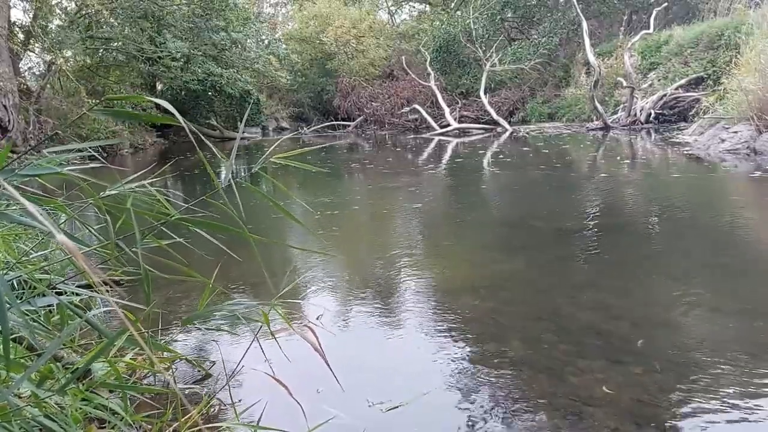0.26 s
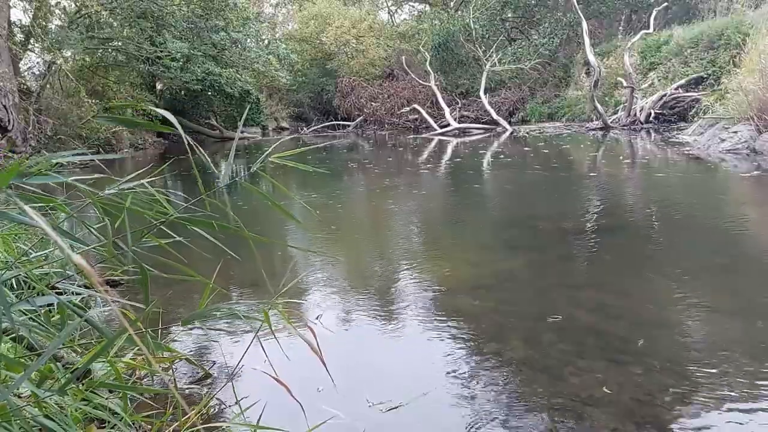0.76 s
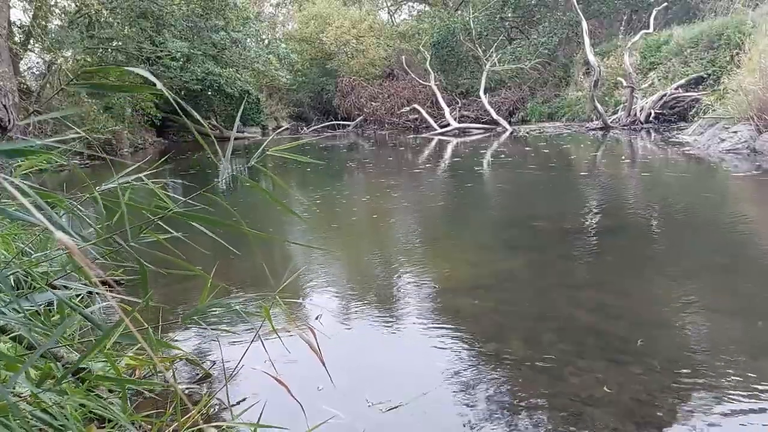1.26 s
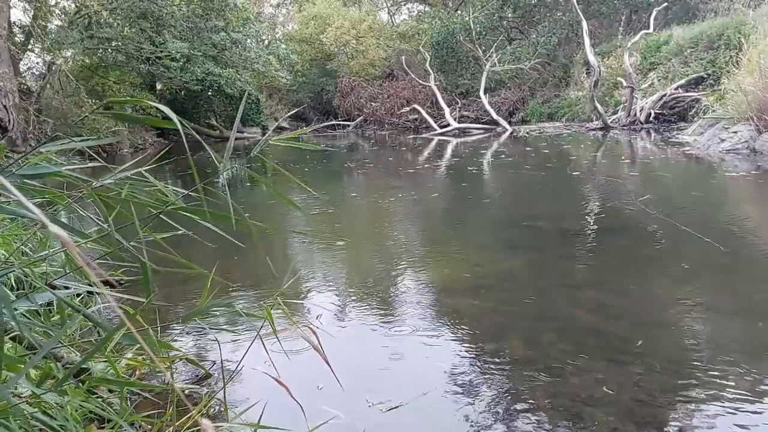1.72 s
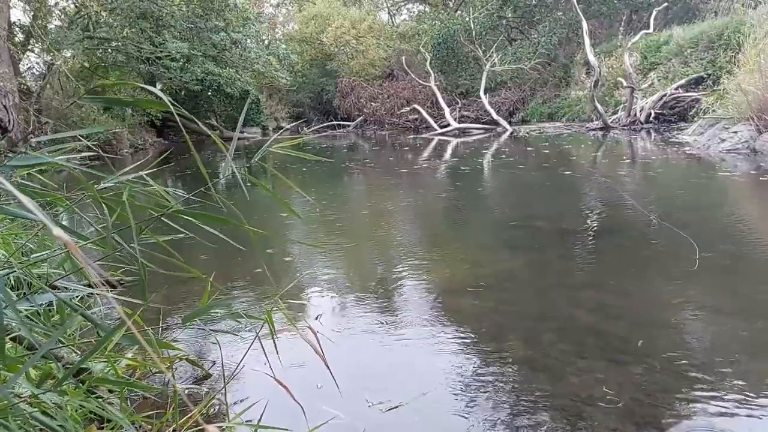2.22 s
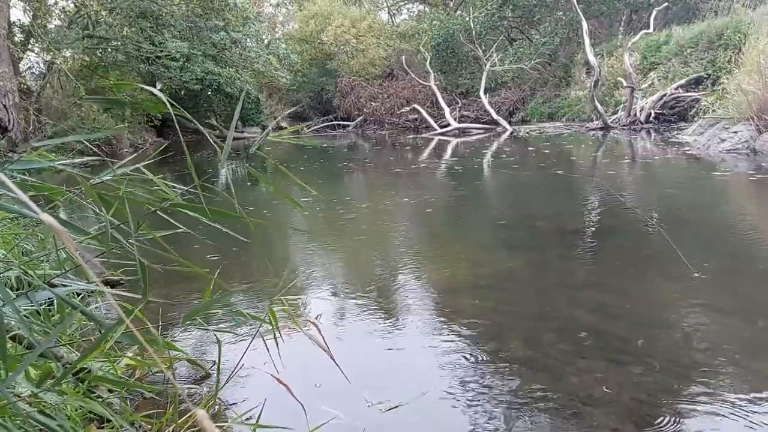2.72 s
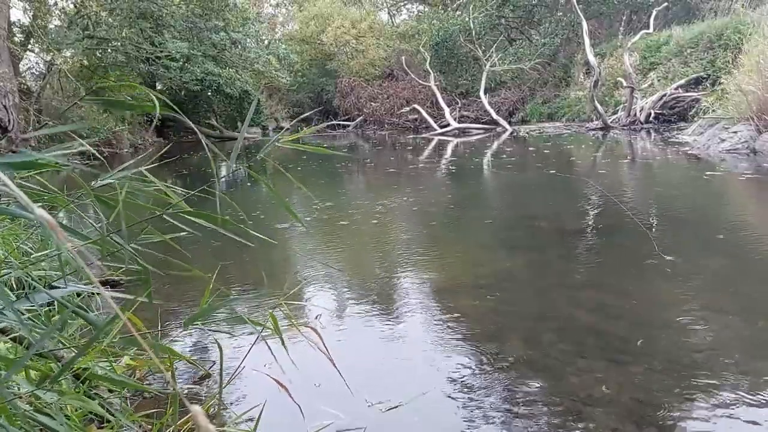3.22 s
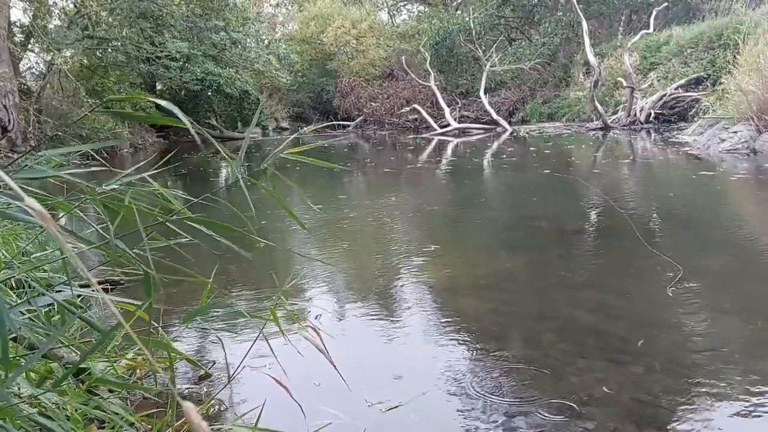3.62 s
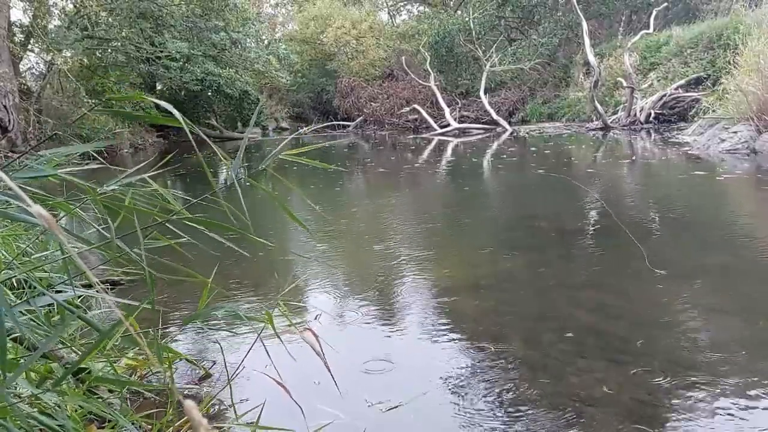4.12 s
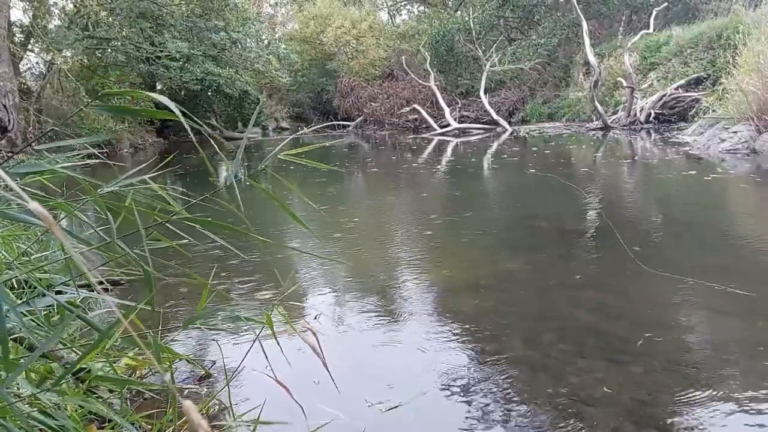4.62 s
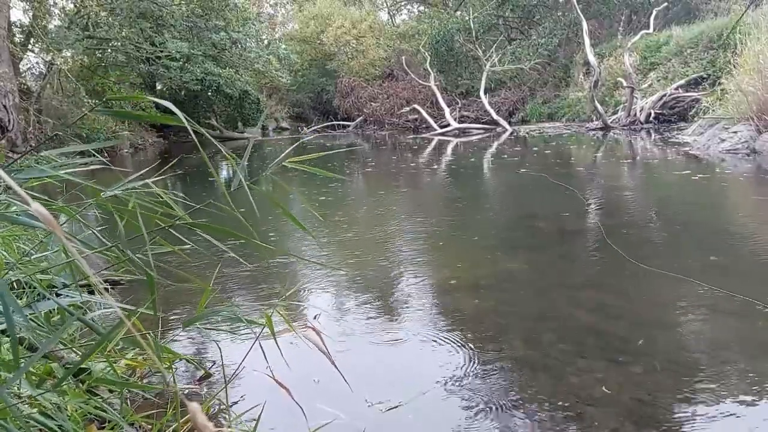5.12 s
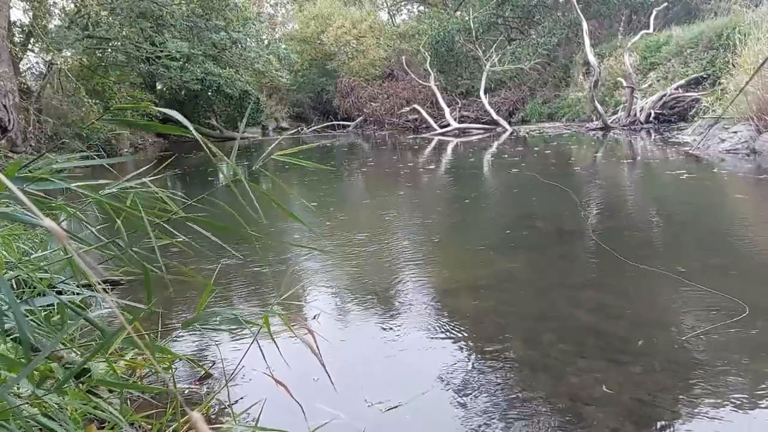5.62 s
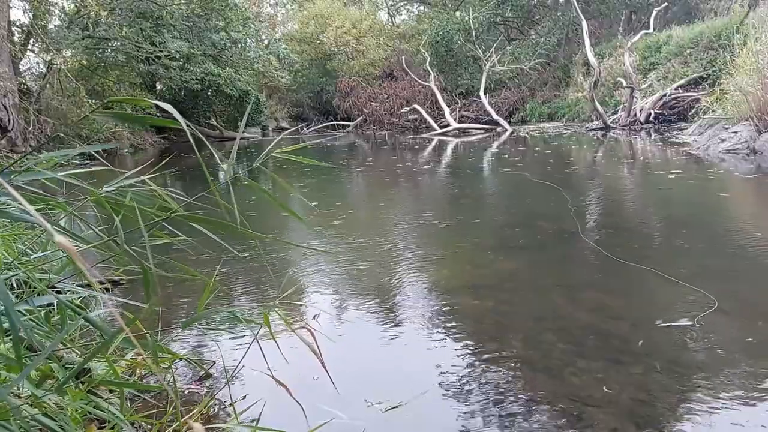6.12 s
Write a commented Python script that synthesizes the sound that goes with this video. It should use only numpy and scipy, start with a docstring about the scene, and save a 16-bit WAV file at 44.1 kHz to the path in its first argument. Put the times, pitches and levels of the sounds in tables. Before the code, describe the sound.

A slow stream makes a faint, even wash with a tiny gurgle throughout, easing slightly toward the end at about 6.4 seconds. Close by, two light bright tackle ticks come near 0.9. From 1.13 to 1.36 the fishing reel gives one loud metallic ratchet rasp, its clicks racing and then slowing. Very faint ticks fall near 2.0 and 2.2, then three crisp reel clicks bunch together around 2.66 to 2.71. A faint bird note at 3.25 and a tiny low plop at 3.4 follow. After a small tick at 3.85, line zips through the rod rings at 3.9, a very short, bright hiss ending in a hard knock. Soft plops ring at 4.1 to 4.3 and 5.1. Distant hoarse bird chirps come at 5.2, 5.35, 5.55 and 5.9, around drops and a small noisy splash at 5.7.

```python
"""A slow stream, where a fly fisher works a line over a faint steady wash of water.
Pawl impacts ring a reel's modes: one quick rasp that speeds up and slows, later three single ticks.
The line zips through the rod rings by stick-slip friction and comes taut with a knock.
Light tackle ticks, ringing plops, a noisy splash and a far bird's short notes are heard around it.
The recorder's gain control steps back on sustained loud sound, waits, then recovers."""
import sys
import numpy as np
from scipy import signal
from scipy.fft import rfft, irfft
from scipy.io import wavfile
from scipy.ndimage import uniform_filter1d, minimum_filter1d

SR = 44100
rng = np.random.default_rng(int(sys.argv[2]) if len(sys.argv) > 2 else 0)


def generate_wav(signal):
    """Clip the signal to [-1, 1] and save it as 16-bit WAV at the path in sys.argv[1]."""
    frames = np.transpose(np.atleast_2d(signal))
    scaled = np.clip(frames, -1, 1) * 32767
    pcm = np.round(scaled).astype(np.int16)
    wavfile.write(sys.argv[1], SR, pcm)


N = 280476
TIME = np.arange(N) / SR   # seconds

# Spool speed in one pull of line. Each row: time in seconds, speed in teeth per second.
SPOOL_SPEED = [(1.126, 52.1), (1.1792, 134.3), (1.1943, 139.8), (1.2429, 102.7), (1.3329, 31.8),
               (1.36, 11.5)]
LIGHT_PHASE = .492   # share of a tooth between the hard and the light contact
PULL_HARD_DB, PULL_LIGHT_DB = 5, 3.5
# Single contacts as the spool creeps on. Each row: start in seconds, level in dB, light contact 0 or 1.
CREEP_CONTACTS = [(2.6636, 1.5, 0), (2.6784, 3.5, 1), (2.7058, 1, 0)]
# Reel modes, the lowest a close pair. Each row: frequency in Hz, 60 dB decay time in seconds,
# relative level in dB under a hard contact, relative level in dB under a light contact.
REEL_MODES = [(1966, 0.013, -3.5, -20), (2030, 0.01, -2.5, -20), (2770, 0.0053, -15.5, -19.5),
              (3300, 0.0051, -9.5, -17.5), (3650, 0.0051, -11.5, -9.5), (4400, 0.0034, -16, -11),
              (5030, 0.0033, -6.5, -28), (5760, 0.0076, -11, -25), (6154, 0.011, -14.5, -14.5),
              (8820, 0.0054, -24, -26), (8930, 0.0069, -20, -29.5), (10680, 0.0043, -18, -17),
              (12290, 0.0035, -12.5, -19.5), (13650, 0.001, -17.5, -7.5)]

# Surges of line through the rings. Each row: peak time in seconds, relative level in dB.
LINE_SURGES = [(3.9032, -12), (3.9076, -6.5), (3.918, -10.5), (3.9245, -8.5)]
SURGE_RISE_DB_PER_S, SURGE_FALL_DB_PER_S = 13999, 1250.5
# Resonances of the rod rings. Each row: frequency in Hz, width in Hz, relative level in dB.
RING_RESONANCES = [(3770, 1200, -7), (4900, 400, -0.5), (5520, 370, 5), (6150, 810, -0.5),
                   (9030, 1050, -32), (10600, 1200, -22), (12800, 1900, -11)]
# Tension builds until the line is taut, then lets go.
TAUT_S, TAUT_DB, TIGHTEN_DB_PER_S, SLACKEN_DB_PER_S = 3.926, -23, 899, 501
# Jolt of the taut line on the rod. Each row: start in seconds, force level in dB.
ROD_KNOCKS = [(3.928, 8.5)]
# Rod and grip modes. Each row: frequency in Hz, 60 dB decay time in seconds, relative level in dB.
ROD_MODES = [(570, 0.023, -27), (750, 0.025, -26.5), (857, .05, -27), (1100, 0.015, -25.5),
             (1400, 0.016, -24.5), (1775, 0.0178, -23.5), (2110, 0.0072, -22), (3276, 0.0031, -21)]

# Light touches of tackle. Each row: start in seconds, ring force in dB, dry crack force in dB.
TACKLE_TICKS = [(.858, -2, -48), (.896, -15, -55), (2.005, -31, -27), (2.225, -26, -42), (3.35, -35, -30),
                (3.8478, -34.5, -23), (3.8508, -11.5, -31)]
# Tackle modes. Each row: frequency in Hz, 60 dB decay time in seconds, relative level in dB.
TACKLE_MODES = [(5300, 0.0073, -20.5), (8000, 0.0098, -36), (12450, .004, -41.5)]

# The line slaps the water.
SPLASH_S, SPLASH_DB, SPLASH_RISE_DB_PER_S, SPLASH_FALL_DB_PER_S = 5.678, -47.5, 1000, 210
# Splash resonances. Each row: frequency in Hz, width in Hz, relative level in dB.
SPLASH_RESONANCES = [(506, 150, 0), (900, 240, 3.5), (1750, 240, 2.5), (3140, 850, -2), (10000, 6600, -18)]
# Plops and drops. Each row: start in seconds, force in dB, pitch in Hz, 60 dB decay time in seconds.
WATER_PLOPS = [(3.419, -44, 294.7, 0.083), (4.107, -40.5, 310, 0.12), (4.245, -39.5, 900, 0.083),
               (4.328, -43.5, 420, 0.063), (5.088, -41, 860, 0.11), (5.476, -50, 1100, .1),
               (5.53, -53, 2020, 0.18), (5.674, -39.5, 509, 0.075), (5.685, -48, 1800, 0.083),
               (5.7, -46, 860, 0.089)]
# Bird notes. Each row: centre in seconds, level in dB, pitch in Hz, half-length in seconds.
BIRD_NOTES = [(3.25, -48, 5950, 0.035), (5.192, -54.5, 4200, 0.035), (5.339, -47.5, 4260, 0.027),
              (5.563, -49.5, 4240, 0.026), (5.912, -51.5, 4400, 0.018)]

# Slow easing of the stream. Each row: time in seconds, level in dB.
STREAM_LEVEL = [(0, -50), (3.1, -50.5), (6.36, -52.5)]
# Spectrum of the wash. Each row: frequency in Hz, relative density in dB per Hz.
WASH_SPECTRUM = [(120, -53), (200, -8.5), (239, -0.5), (281, 0), (330, 0.5), (464, -2), (795, -5.5),
                 (951, -6.5), (1780, -14), (2940, -12.5), (4690, -13), (5920, -12.5), (7340, -24),
                 (13000, -20), (14500, -28.5)]
RUMBLE_DB = -31   # below 200 Hz, relative to the wash
# Short noisy tail after each tackle sound. Each row: delay in seconds, relative level in dB.
TAIL_DECAY = [(.004, 7), (.012, 0.5), (.038, -4), (.055, -13.5), (.09, -42)]

# The recorder's gain control and its upper band limit.
AGC_THRESHOLD_DB, AGC_DEPTH_DB, AGC_WINDOW_S, AGC_HOLD_S, AGC_RECOVER_DB_PER_S = -18, 4, .08, 1.056, 8
CUTOFF_HZ = 14500


def pawl_contacts():
    """Ratchet kinematics: turning integrates spool speed; each tooth gives a hard, then a light contact."""
    s, speed = np.transpose(SPOOL_SPEED)
    moving = TIME[(TIME >= s[0]) & (TIME <= s[-1])]
    turned = np.cumsum(np.interp(moving, s, speed)) / SR   # teeth
    rows = []
    for tooth in range(int(turned[-1]) + 1):
        for phase, db, light in [(0, PULL_HARD_DB, 0), (LIGHT_PHASE, PULL_LIGHT_DB, 1)]:
            if tooth + phase < turned[-1]:
                rows.append((np.interp(tooth + phase, turned, moving), db, light))
    return rows


def reel(level_db=3.5, low_cut_hz=1660, detune=0.013, uneven_db=1.8, size=1500):
    """Modal excitation: hard and light contacts ring the same modes in different proportions."""
    body = np.zeros(N)
    dying = np.exp(-np.arange(size) / (.0016 * SR))
    clicks = pawl_contacts() + CREEP_CONTACTS
    grit = butter(rng.standard_normal((len(clicks), size)), 4200, "high")
    chance = rng.standard_normal((len(clicks), len(REEL_MODES), 2))
    chance[:, 1] = chance[:, 0]   # the close pair moves as one
    for (s, db, light), chatter, variation in zip(clicks, grit, chance):
        is_light = light > .5
        # one sharp blow, then the pawl chatters on the tooth
        force = (.15 if is_light else .11) * dying * chatter
        force[0] = 1
        force *= from_db(db) / np.linalg.norm(force)
        at = round(s * SR)
        for k, (mode, (pitch, strength)) in enumerate(zip(REEL_MODES, variation)):
            hz, t60, hard_db, light_db = mode
            mode_db = light_db if is_light else hard_db
            # each contact loads the modes a little differently; senses alternate pair by pair
            gain = (-1) ** ((k + 1) // 2) * from_db(mode_db + uneven_db * strength)
            body[at:at + size] += gain * ring(force, hz * (1 + detune * pitch), t60)
    # so small a body radiates almost no bass
    return from_db(level_db) * butter(body, low_cut_hz, "high", order=10)


def line_zip(hiss_db=2.0, slips_per_s=4000, rub=0.66, fast_hz=4900, slow_hz=3100):
    """Stick-slip friction: random slips excite the rings, and tension couples them to the rod."""
    sparse_slips = (rng.random(N) < slips_per_s / SR) * rng.standard_normal(N)
    slips = rms_one(sparse_slips + rub * rng.standard_normal(N))
    rings = resonate(slips, RING_RESONANCES)
    # as the line slows, its hiss reaches lower
    slowed = np.interp(TIME, [LINE_SURGES[0][0], TAUT_S], [0, 1])
    low_hiss = butter(rings, [slow_hz, max(fast_hz, slow_hz + 100)], "band")
    hiss = butter(rings, fast_hz, "high", order=4) + slowed * low_hiss
    surges = [swell(s, db, SURGE_RISE_DB_PER_S, SURGE_FALL_DB_PER_S) for s, db in LINE_SURGES]
    sliding = np.max(surges, axis=0)
    tension = swell(TAUT_S, TAUT_DB, TIGHTEN_DB_PER_S, SLACKEN_DB_PER_S)
    force = tension * slips + contacts(ROD_KNOCKS, chatter=0.019, chatter_s=0.002)
    rod = sum((-1) ** k * from_db(db) * ring(force, hz, t60) for k, (hz, t60, db) in enumerate(ROD_MODES))
    return from_db(hiss_db) * sliding * hiss + butter(rod, 380, "high", order=4)


def tackle_ticks():
    """Impact of small hard parts: a broadband dry crack and a short modal ring."""
    force = contacts([(s, db) for s, db, crack_db in TACKLE_TICKS], chatter=.02, chatter_s=0.001056)
    crack = contacts([(s, crack_db) for s, db, crack_db in TACKLE_TICKS], chatter=.3, chatter_s=.0007)
    rings = sum(from_db(db) * ring(force, hz, t60) for hz, t60, db in TACKLE_MODES)
    return butter(rings, 4400, "high", order=4) + butter(crack, 5000, "high")


def noisy_tail(x, tail_db):
    """Convolution with shaped noise: a short tail that fades for about 40 ms, then drops away."""
    tail = (gain_curve(TAIL_DECAY) * rng.standard_normal(N))[:SR // 8]
    return x + from_db(tail_db) * signal.fftconvolve(x, tail / np.linalg.norm(tail))[:N]


def splash():
    """Resonant filtering of noise: a short spatter as the line meets the surface."""
    spatter = resonate(rng.standard_normal(N), SPLASH_RESONANCES)
    return swell(SPLASH_S, SPLASH_DB, SPLASH_RISE_DB_PER_S, SPLASH_FALL_DB_PER_S) * spatter


def plops(grain=0.28):
    """Bubble resonance: each small air pocket rings briefly and unevenly."""
    rings = 0
    for s, db, hz, t60 in WATER_PLOPS:
        rings = rings + ring(contacts([(s, db)], chatter=0.018, chatter_s=.002), hz, t60)
    return butter(rings * (1 + grain * drift(220)), 265, "high", order=6)


def bird(width_hz=270):
    """Source and filter: noise through one throat resonance makes each short hoarse note."""
    out = 0
    for s, db, hz, half_length in BIRD_NOTES:
        note = resonate(rng.standard_normal(N), [(hz, width_hz, 0)])
        out = out + from_db(db) * note * np.exp(-2 * ((TIME - s) / half_length) ** 2)
    return butter(out, [2500, 7500], "band")


def stream(level_db=0.0, gurgle_db=-15, bubbles_per_s=130, cycles=5.3, low_cut_hz=205, count=14):
    """Superposition: running water merges into shaped noise, with random bubbles gurgling faintly in it."""
    hz, db = np.transpose(WASH_SPECTRUM)
    bins_hz = np.arange(N // 2 + 1) * SR / N
    colour = from_db(np.interp(np.log(bins_hz + 1), np.log(hz), np.maximum(db, -45)))
    wash = irfft(rfft(rng.standard_normal(N)) * colour, N)
    wash = rms_one(butter(wash, low_cut_hz, "high", order=8))
    rumble = from_db(RUMBLE_DB) * rms_one(butter(rng.standard_normal(N), [75, 200], "band"))
    born = (rng.random(N) < bubbles_per_s / SR) * rng.standard_normal(N)
    # each bubble is dealt one pitch and decays over a fixed number of cycles
    dealt, pitches = rng.integers(0, count, N), np.geomspace(260, 1200, count)
    gurgle = rms_one(sum(ring(born * (dealt == k), f, cycles / f) for k, f in enumerate(pitches)))
    gurgle = from_db(gurgle_db) * butter(gurgle, low_cut_hz, "high", order=6)
    easing_db = np.interp(TIME, *np.transpose(STREAM_LEVEL))
    return from_db(level_db + easing_db) * (wash + rumble + gurgle)


def contacts(rows, chatter, chatter_s, size=400):
    """Impact force: each (seconds, dB) contact is one sharp blow, then a brief dying chatter."""
    force = np.zeros(N)
    for (s, db), grit in zip(rows, rng.standard_normal((len(rows), size))):
        blow = chatter * grit * np.exp(-np.arange(size) / (chatter_s * SR))
        blow[0] = 1
        at = round(s * SR)
        force[at:at + size] += from_db(db) * blow / np.linalg.norm(blow)
    return force


def ring(force, hz, t60):
    """Damped oscillator: a unit click sets a decaying sine of starting height 1 ringing."""
    r, w = from_db(-60 / (t60 * SR)), 2 * np.pi * hz / SR
    return signal.lfilter([0, np.sin(w)], [1, -2 * r * np.cos(w), r * r], force + 1e-18)


def resonate(x, peaks):
    """Parallel resonance: (Hz, width in Hz, dB) peaks add with alternating signs, at unit rms."""
    out = 0
    for k, (hz, width, db) in enumerate(peaks):
        r = np.exp(-np.pi * width / SR)
        poles = [1, -2 * r * np.cos(2 * np.pi * hz / SR), r * r]
        out = out + (-1) ** k * from_db(db) * (1 - r * r) * signal.lfilter([1, 0, -1], poles, x)
    return rms_one(out)


def swell(s, db, rise_db_per_s, fall_db_per_s):
    """Exponential growth and decay: gain climbs to its peak at s and dies away."""
    below_peak_db = np.maximum((s - TIME) * rise_db_per_s, (TIME - s) * fall_db_per_s)
    return from_db(db - np.minimum(below_peak_db, 200))


def gain_curve(rows):
    """Piecewise exponential envelope: gain from (seconds, dB) rows, silent outside them."""
    s, db = np.transpose(rows)
    return from_db(np.interp(TIME, s, db, left=-200, right=-200))


def drift(rate):
    """Band-limited chance: a random line through independent knots, rate of them per second."""
    knots = rng.standard_normal(4000)
    return np.interp(TIME * rate, np.arange(len(knots)), knots)


def butter(x, hz, kind, order=2):
    """Linear filtering: a causal Butterworth response."""
    sos = signal.butter(order, np.clip(hz, 10, .45 * SR), kind, fs=SR, output="sos")
    return signal.sosfilt(sos, x)


def rms_one(x):
    """Power normalisation: scale to unit rms."""
    return x / np.sqrt(np.mean(x ** 2) + 1e-20)


def from_db(db):
    """Logarithmic level: decibels to amplitude gain."""
    return 10 ** (np.asarray(db) / 20)


def gain_control(x):
    """Feedforward compression: gain drops when recent level passes the threshold, holds, creeps back."""
    window, hold = int(AGC_WINDOW_S * SR), int(AGC_HOLD_S * SR)
    # the origins make both windows look back in time
    power = np.abs(uniform_filter1d(x ** 2, window, origin=(window - 1) // 2))
    level_db = 10 * np.log10(power + 1e-12)
    cut_db = np.clip(level_db - AGC_THRESHOLD_DB, 0, AGC_DEPTH_DB)
    held_db = -minimum_filter1d(-cut_db, hold, origin=(hold - 1) // 2, mode="constant")
    recovery_db = AGC_RECOVER_DB_PER_S * TIME
    return from_db(recovery_db - np.maximum.accumulate(held_db + recovery_db))


def scene():
    """Superposition of sources: tackle sounds with noisy tails, then water and bird without them."""
    reel_and_zip = noisy_tail(reel(), tail_db=-18) + noisy_tail(line_zip(), tail_db=-21)
    tackle = reel_and_zip + noisy_tail(tackle_ticks(), tail_db=-9)
    return (tackle + plops() + splash() + bird() + stream())[None]


def record(dry, ceiling=1.0, size=45):
    """Dynamic range control: slow gain, a fast look-ahead limiter, then a low-pass cut of the top."""
    levelled = dry * gain_control(dry[0])
    allowed = np.minimum(1, ceiling / (np.abs(levelled) + 1e-9))
    limited = levelled * uniform_filter1d(minimum_filter1d(allowed, size), size)
    return signal.sosfilt(signal.butter(20, CUTOFF_HZ, fs=SR, output="sos"), limited)


dry = scene()
out = record(dry)
generate_wav(out)
```